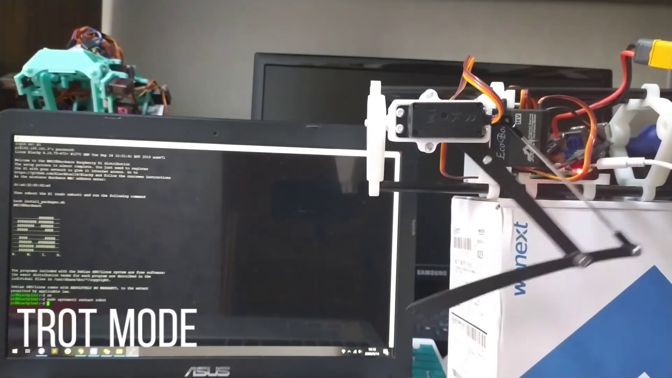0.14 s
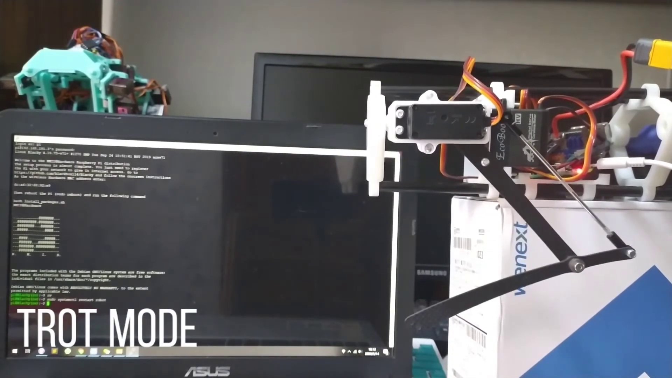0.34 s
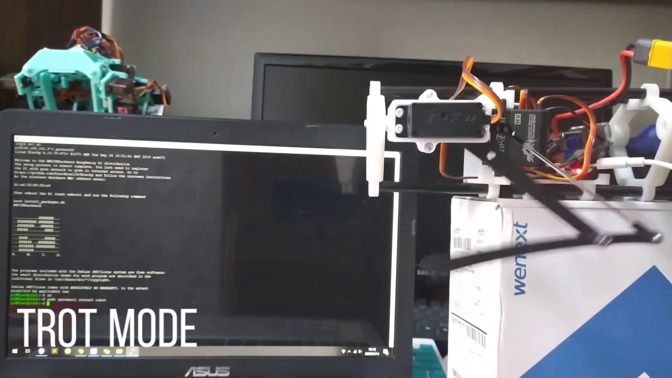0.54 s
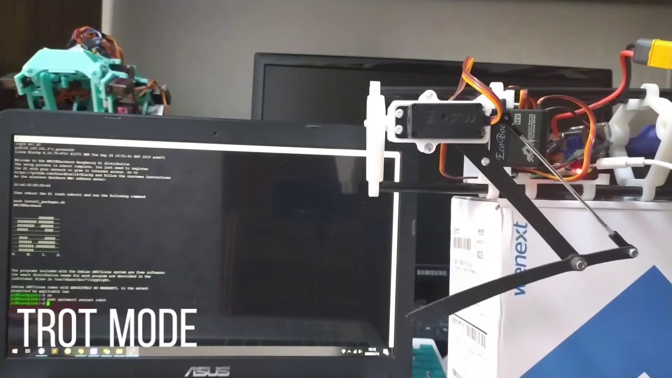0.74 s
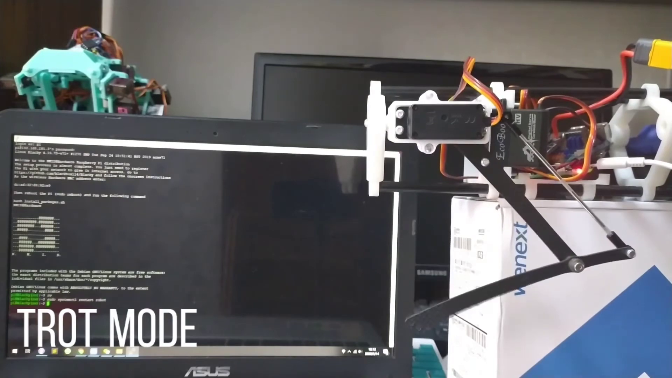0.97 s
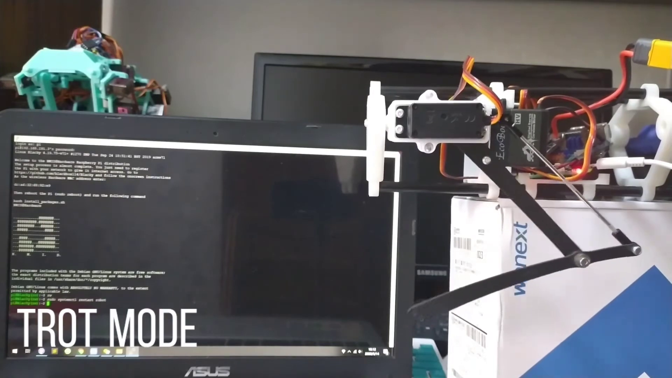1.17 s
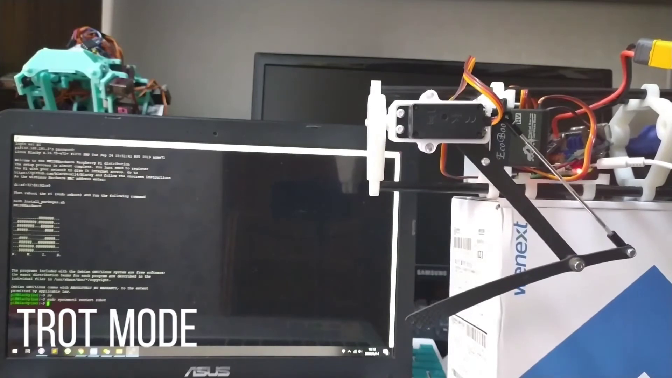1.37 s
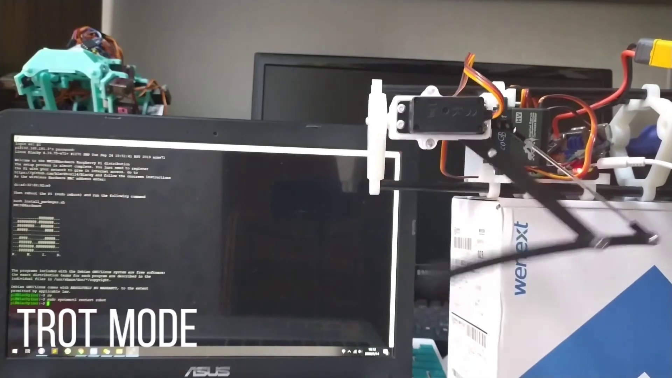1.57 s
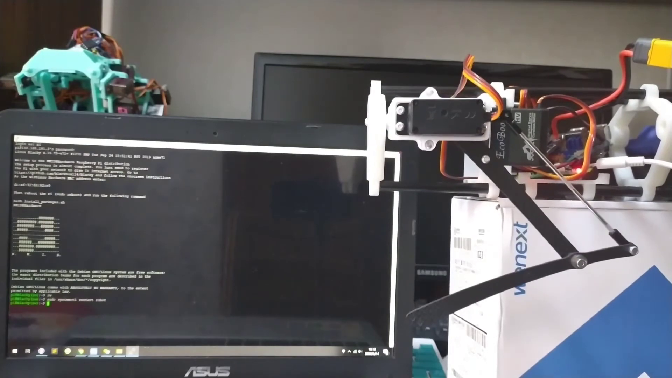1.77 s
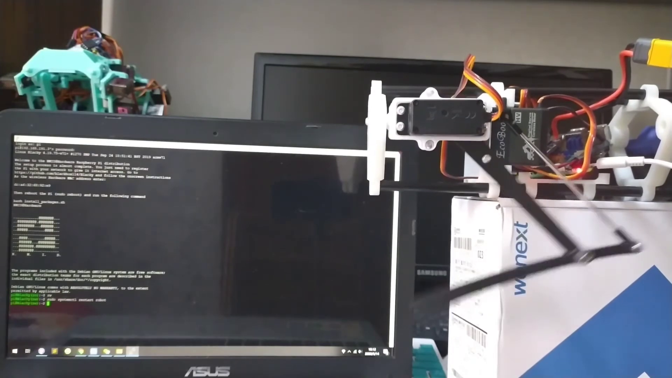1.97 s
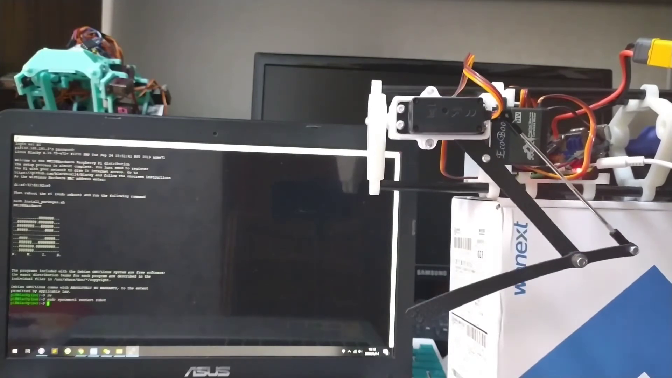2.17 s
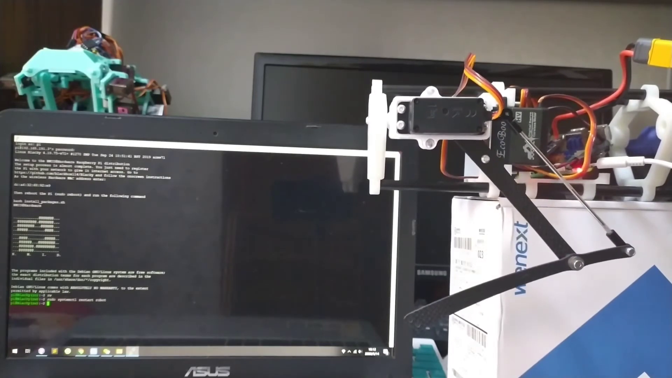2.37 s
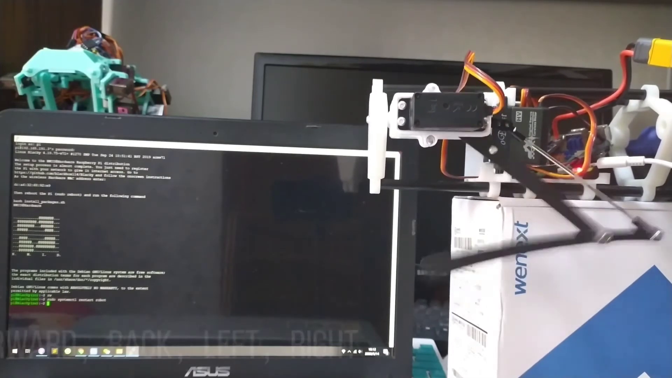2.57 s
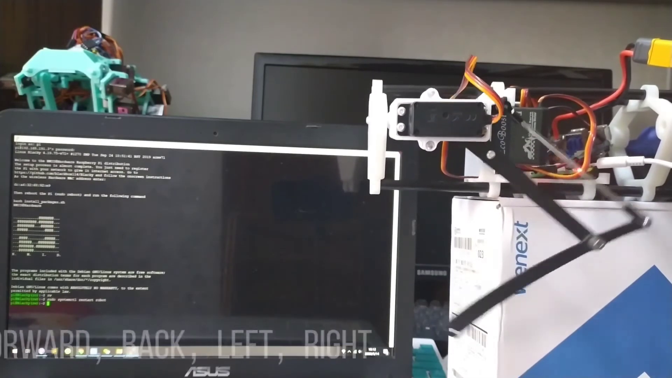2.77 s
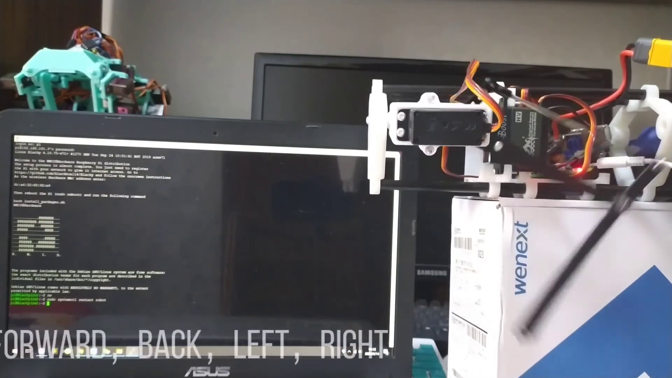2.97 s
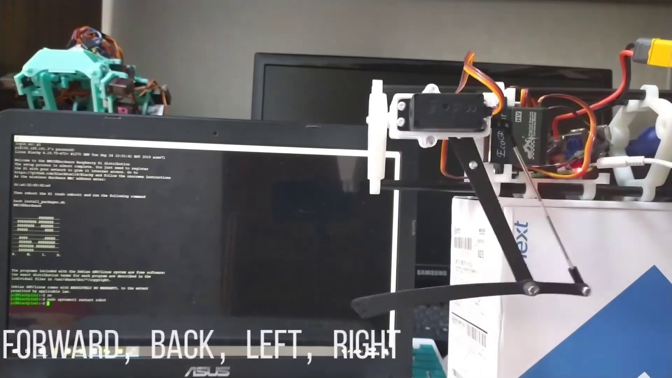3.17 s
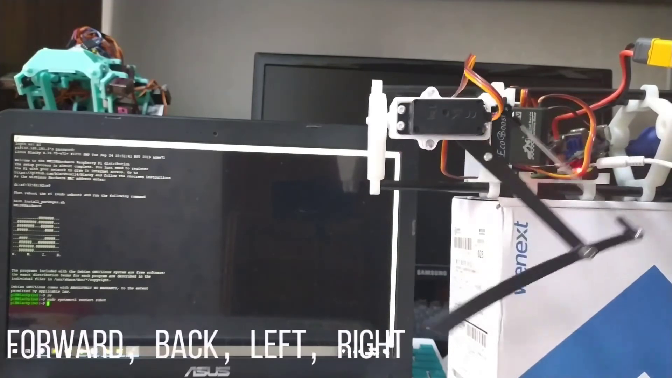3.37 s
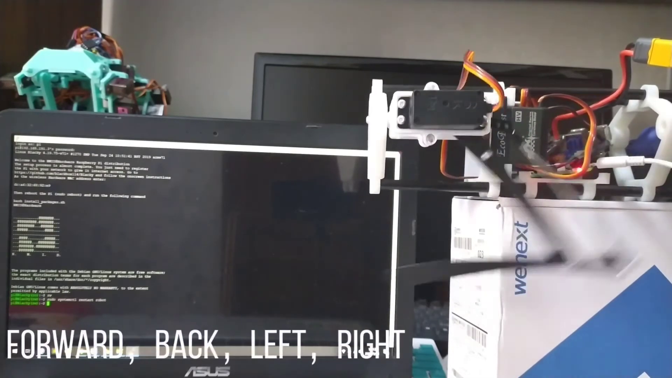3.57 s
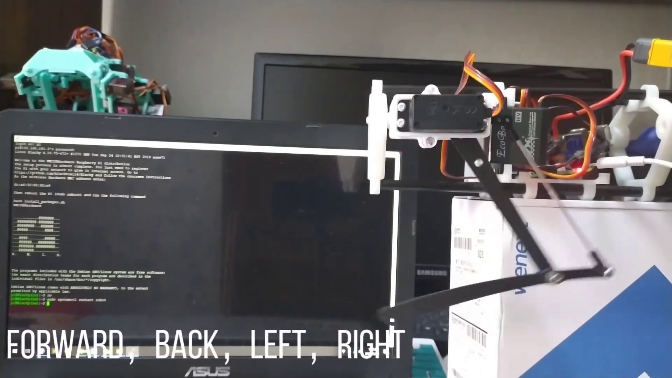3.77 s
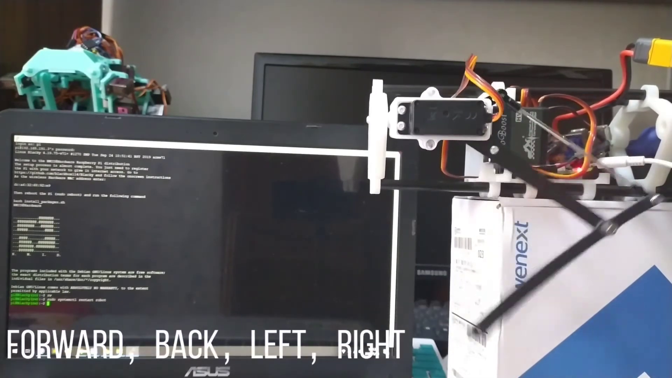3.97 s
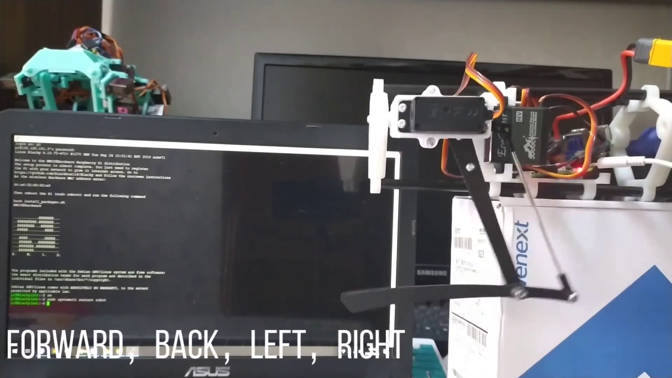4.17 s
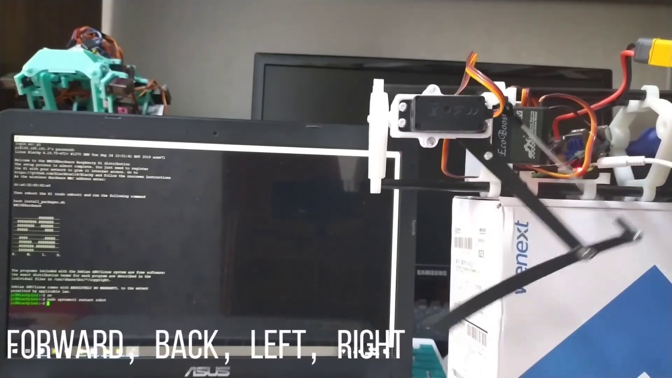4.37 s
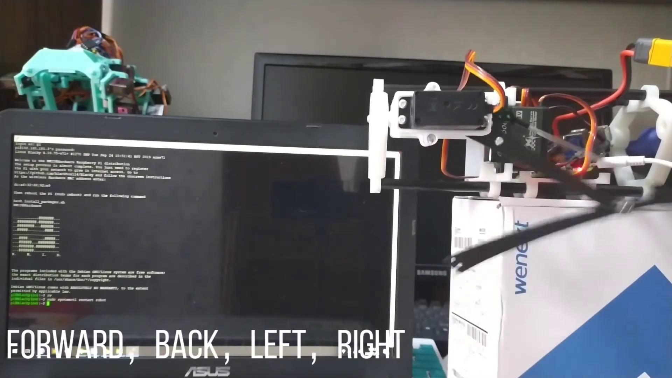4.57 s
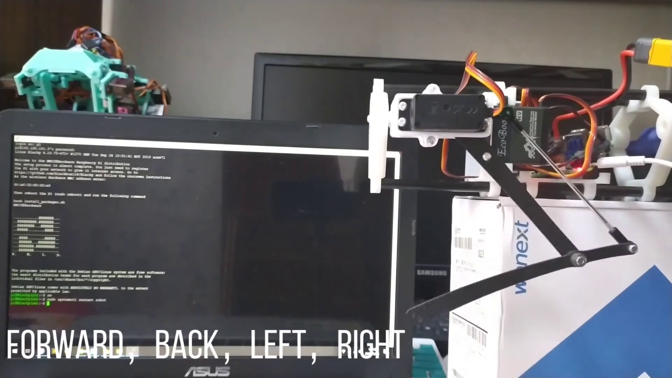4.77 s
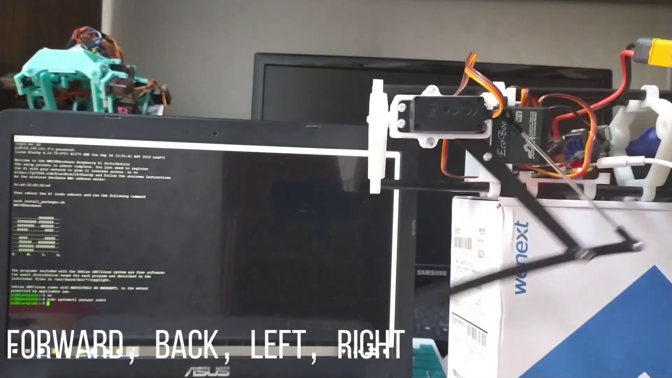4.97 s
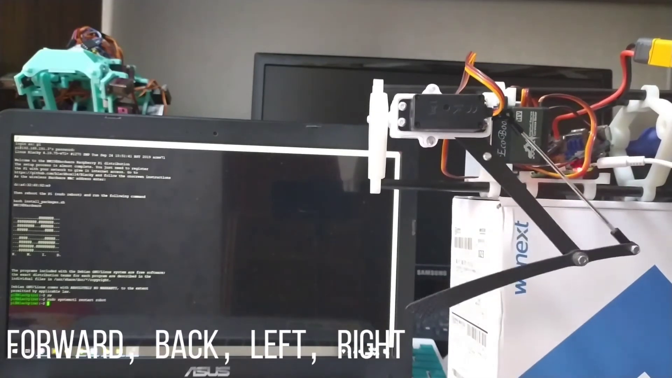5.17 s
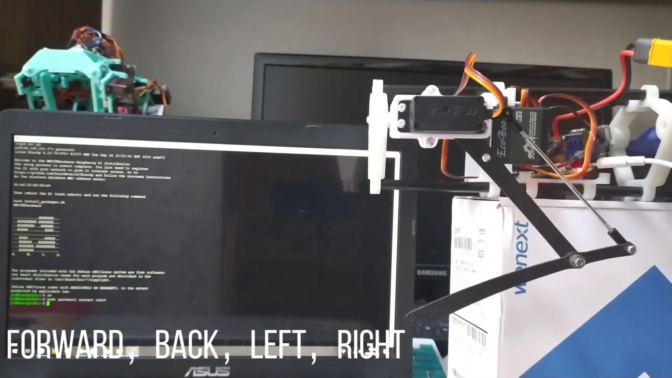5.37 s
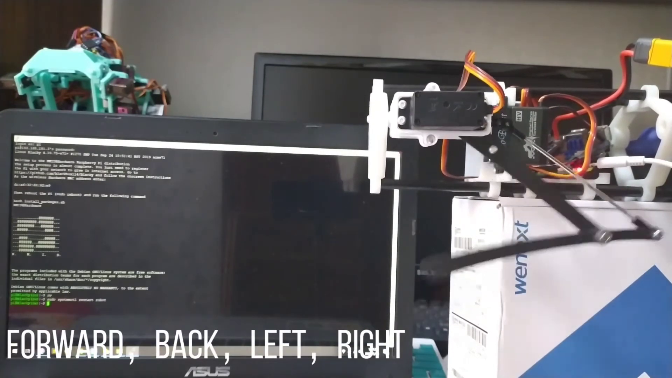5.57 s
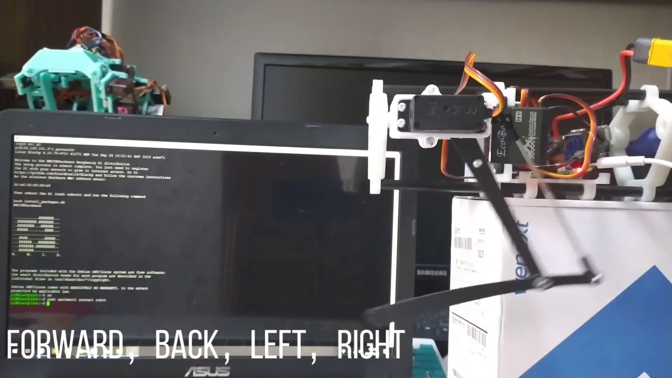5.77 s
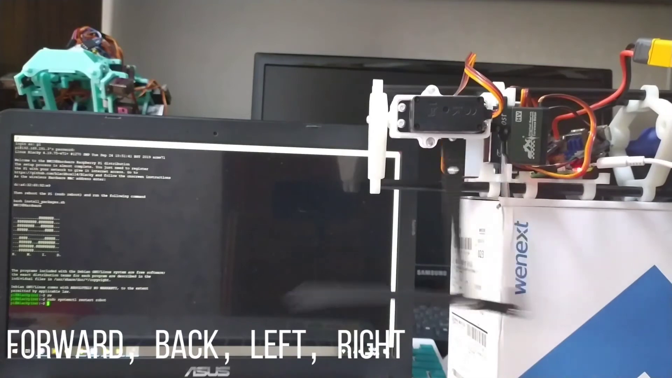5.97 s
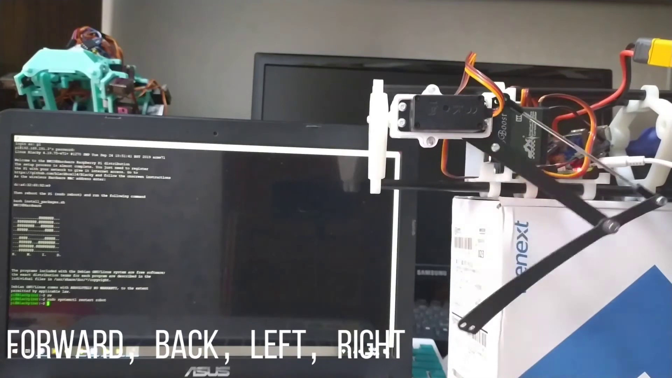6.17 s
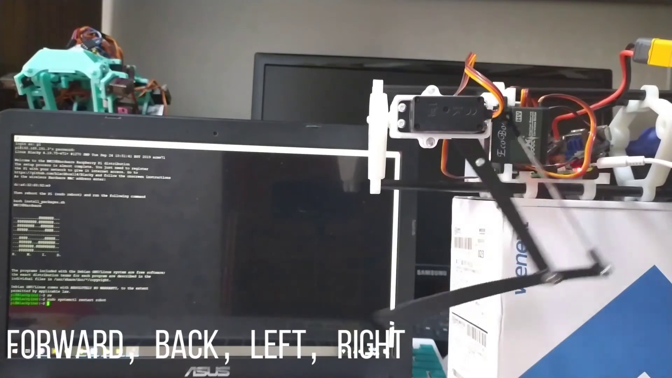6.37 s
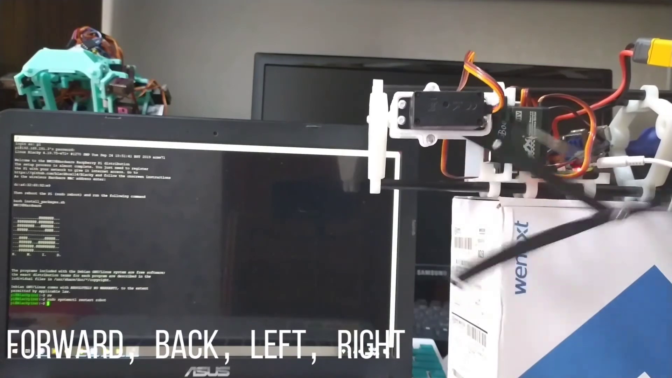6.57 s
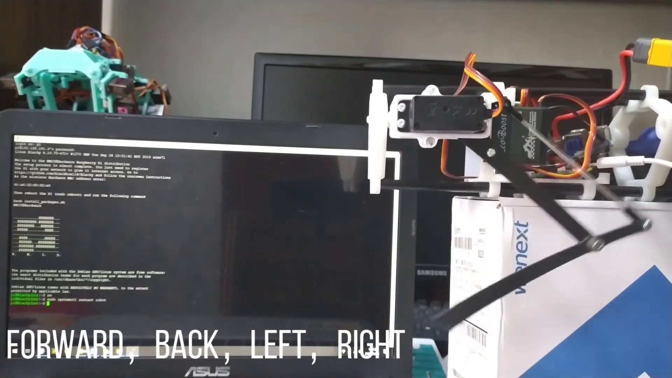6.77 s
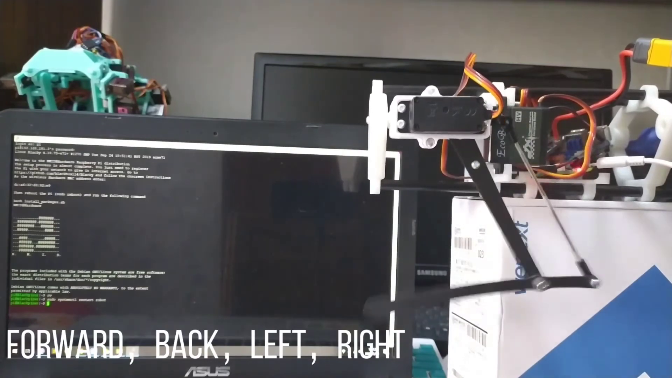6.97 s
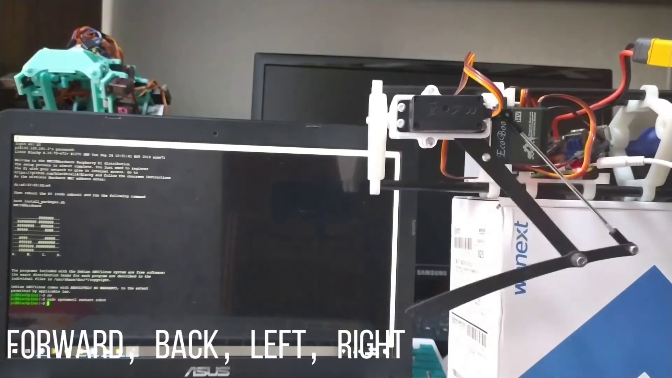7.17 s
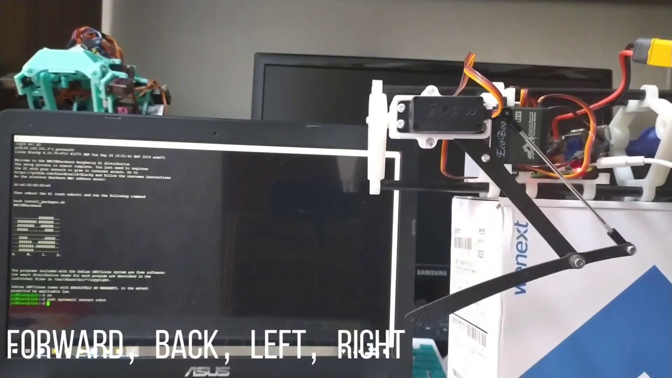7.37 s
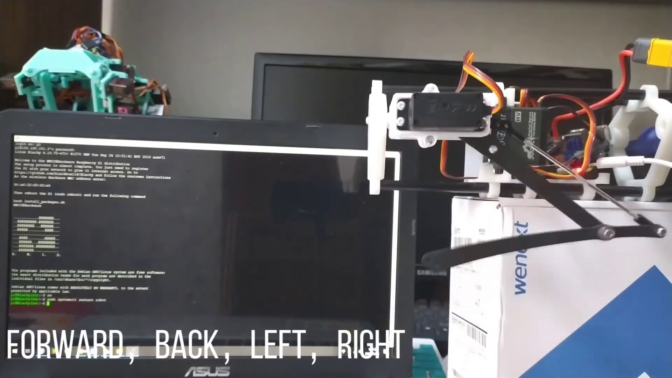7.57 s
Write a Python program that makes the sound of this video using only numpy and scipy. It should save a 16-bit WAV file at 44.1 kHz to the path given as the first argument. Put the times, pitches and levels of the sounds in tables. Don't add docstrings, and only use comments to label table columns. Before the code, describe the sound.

A small robot leg works on a bench, heard close in stereo in a quiet room with faint low hum, soft air and an intermittent, very high thin supply whistle. From 0 to 2.7 seconds, paired servo bursts come every half second: a short bright rasp, then a shorter set-down zip, with near silence between and tiny linkage ticks. From about 2.8 to 4.5 seconds the strokes run almost together, soft grinding creeps swelling into loud fast swings near 3.1, 3.6 and 4.1, with rough gear whine gliding upward. Paired steps resume at 4.6, 5.1 and 5.6 while the hum is slightly stronger until 6. From 5.8 to 7 a whining push leads to harsh swings near 6.1 and 6.6, then a softer dipping whine. Double rasp at 7.05, final burst at 7.55. Dense gritty plastic rattle dominates, with slight bench rumble and short room tail.

```python
import sys
import numpy as np
from scipy import signal
from scipy.fft import rfft, irfft, next_fast_len
from scipy.io import wavfile
from scipy.ndimage import uniform_filter1d

SR = 44100
rng = np.random.default_rng(int(sys.argv[2]) if len(sys.argv) > 2 else 0)


def wav_record(signal):
    frames = np.transpose(np.atleast_2d(signal))
    bounded = np.clip(frames, -1, 1)
    quanta = np.round(bounded * 32767).astype(np.int16)
    wavfile.write(sys.argv[1], SR, quanta)


def boost_factor(decibels):
    exponent = np.asarray(decibels, float) / 20
    return 10 ** exponent


N = 336483


def rms_one(x):
    return x / np.sqrt(np.mean(np.atleast_2d(x).mean(axis=0) ** 2) + 1e-20)


def at_hz(points, hz):
    table_hz, values = np.array(points).T
    return np.interp(np.log(hz), np.log(table_hz), values)


def drift(rate):
    r = np.exp(-80 * np.pi * rate / SR)
    slow = signal.lfilter([1], [1, -2 * r, r * r], rng.standard_normal(N // 40 + 2002))[2000:]
    return np.interp(np.arange(N) / 40, np.arange(len(slow)), slow / slow.std())


def cut(x, hz, kind, order):
    return signal.sosfilt(signal.butter(order, hz, kind, fs=SR, output="sos"), x)


def tone(hz, blur_hz, second_db, waver_db):
    turn = 2 * np.pi * np.cumsum(hz + blur_hz * drift(60)) / SR
    overtones = 0
    for number, share in [(2, 1), (3, .9), (4, .7), (5, .7), (6, .6)]:
        overtones = overtones + share * np.sin(number * turn)
    return np.sqrt(2) * boost_factor(waver_db * drift(40)) * (np.sin(turn) + boost_factor(second_db) * overtones)


# (f/Hz, level/dB per Hz)
AIR = [(12, -30), (20, 1), (33, -7), (64, -6), (82, -12.5), (149, -22), (200, -10), (293, -18), (405, -20),
       (608, -22.5), (819, -21), (1410, -25.5), (3090, -29.5), (5610, -41.5), (11000, -32), (14500, -44)]
# (f/Hz, likeness -1 to 1)
LIKENESS = [(25, -0.4), (60, .6), (130, 0.67), (300, 0.45), (640, 0.21), (1400, -0.45), (3000, .1),
            (15000, -0.15)]


def air():
    out, edges = 0, 20 * 2 ** np.arange(0, 9.8, .5)
    white = rng.standard_normal((2, 2, N))
    for k, (low, high) in enumerate(zip(edges, edges[1:])):
        mid, side = cut(white[k % 2], [low, high], "band", order=2)
        hz = np.sqrt(low * high)
        alike = np.clip(at_hz(LIKENESS, hz), -.95, .95)
        stereo = mid + np.sqrt((1 - alike) / (1 + alike)) * side * [[1], [-1]]
        out = out + boost_factor(at_hz(AIR, hz) + 1.87 * drift(24)) * stereo
    return boost_factor(-63) * rms_one(out)


HUM_HZ, HUM_DB = 61, -69.5
HUM_SWELL_S, HUM_SWELL_DB = (3.54, 6.03), 5


def mains_hum():
    t = np.arange(N) / SR
    swell = uniform_filter1d(1. * (t > HUM_SWELL_S[0]) * (t < HUM_SWELL_S[1]), size=SR // 3)
    level = boost_factor(HUM_DB + HUM_SWELL_DB * swell - 2)
    return level * tone(HUM_HZ + 3.5 * drift(4), blur_hz=8, second_db=-40, waver_db=3.0) * [[.9], [1.0]]


WHISTLE_HZ, WHISTLE_DB = 15475, -77


def supply_whistle():
    on = np.clip(3 * drift(7) + .5, 0, 1)
    line = tone(WHISTLE_HZ, blur_hz=30, second_db=-99, waver_db=2.5)
    return on * [[.9], [.9]] * boost_factor(WHISTLE_DB + 6) * line


# (t/s, peak level/dB, f/Hz, decay/s)
TICKS = [(.004, -42.5, 9000, 0.0069), (.024, -53, 8000, 0.022), (0.352, -44, 8180, 0.025),
         (0.388, -52, 1510, 0.026), (.495, -44, 7600, 0.011), (.9, -59, 8500, 0.0173),
         (1.327, -47.5, 600, 0.0048), (1.389, -52.5, 8540, 0.018), (1.993, -53, 8480, 0.0086),
         (2.286, -48, 7664, .008), (3.273, -38, 7950, 0.014), (4.514, -40, 950, 0.013),
         (5.729, -44, 790, 0.0088), (6.788, -46.5, 799, 0.0098)]


def ticks():
    out, t = np.zeros((2, N + 3000)), np.arange(3000) / SR
    for s, db, hz, decay in TICKS:
        puff = rng.standard_normal((2, 3000)) * t * np.exp(-2 * t / decay)
        puff = cut(puff, [hz * 0.74, hz * 1.52], "band", order=2)
        first = round(s * SR)
        out[:, first:first + 3000] += boost_factor(db) * puff / np.abs(puff).max()
    return out[:, :N]


# (start t/s, lift level/dB, set-down level/dB, mesh f/Hz, rotor level/dB)
STEPS = [(0.055, -35, -34, 1660, -64), (0.555, -35, -33, 1536, -61), (1.054, -35.5, -35, 1554, -58),
         (1.554, -36.5, -34.5, 1552, -60), (2.053, -36, -34.5, 1562, -58), (2.554, -36, -30.5, 1514, -67.5),
         (4.557, -33, -33.5, 1706, -78), (5.056, -37, -34.5, 1522, -68), (5.556, -36, -32, 1596, -65),
         (7.047, -33, -30.5, 1777, -64), (7.555, -35, -35, 1650, -70)]
LIFT_S, LIFT_RISE_DB = 0.072, 1
SET_AFTER_S, SET_S, SET_FALL_DB = 0.11, .046, 5
# (start t/s, powered length t/s, first rattle level/dB, last rattle level/dB, mesh f/Hz)
WALK = [(0.396, 0.15, -73, -61.5, 1650), (2.768, 0.0737, -50.5, -43.5, 1718), (2.835, 0.14, -41, -42, 1590),
        (2.98, 0.052, -29.5, -36, 1650), (3.05, 0.161, -26.5, -31.5, 1800), (3.287, 0.12, -49, -46.5, 1680),
        (3.413, 0.14, -39.5, -43, 1640), (3.562, 0.13, -27.5, -31, 1820), (3.759, 0.169, -48, -47, 1787),
        (3.9, 0.15, -36.5, -43.5, 1700), (4.047, 0.14, -32.5, -31, 1807), (4.262, 0.15, -47, -45.5, 1809),
        (4.414, 0.092, -33.5, -45.5, 1680), (4.487, 0.062, -47.5, -39, 1624),
        (5.789, 0.21, -44.5, -43.5, 1547), (6.001, .04, -37.5, -36.5, 1640), (6.052, 0.17, -28, -34, 1820),
        (6.278, 0.11, -49.5, -45, 1670), (6.37, 0.17, -40, -42.5, 1620), (6.548, 0.15, -32.5, -32.5, 1775),
        (6.77, 0.1, -47, -46.5, 1712), (6.858, 0.095, -43, -38, 1715), (6.959, 0.046, -46.5, -50, 1715)]


def strokes():
    lifts = [(s, LIFT_S, db - LIFT_RISE_DB, db + LIFT_RISE_DB, hz, 0) for s, db, _, hz, _ in STEPS]
    sets = [(s + SET_AFTER_S, SET_S, db + SET_FALL_DB / 2, db - SET_FALL_DB / 2, hz, 0)
            for s, _, db, hz, _ in STEPS[:-1]]
    return lifts + sets + [(*row, 1) for row in WALK]


SPIN_UP_S, RUN_DOWN_DB_PER_S = 0.015, 442
PITCH_LAG, PITCH_LAG_S = 0.13, .035


def effort():
    power, since = np.full((3, N + SR), 1e-12), np.arange(SR // 2) / SR
    ones, catch_up = np.ones(SR // 2), 1 - PITCH_LAG * np.exp(-since / PITCH_LAG_S)
    spin = (1 - np.exp(-since / SPIN_UP_S)) ** 2
    for start, length, first_db, last_db, hz, walking in strokes():
        db = first_db + (last_db - first_db) * np.clip(since / length, 0, 1)
        db = db - RUN_DOWN_DB_PER_S * np.clip(since - length, 0, 1)
        first = round(start * SR)
        weights = np.array([ones, hz * catch_up, walking * ones])
        power[:, first:first + SR // 2] += (spin * boost_factor(db)) ** 2 * weights
    total, pitch, gait = power[:, :N]
    return np.sqrt(total), uniform_filter1d(pitch / total, size=500), gait / total


def contacts(per_s, spread_db):
    sizes = boost_factor(spread_db * np.minimum(rng.exponential(1, N), 4)) * rng.choice([-1, 1], N)
    return rms_one(sizes * (rng.random(N) < per_s / SR) + 1e-9)


def body(modes, per_s, spread_db, own, wander_db):
    out, share = np.zeros((2, N)), np.clip(own, 0, 1)
    knocks = [contacts(per_s, spread_db) for k in range(4)]
    for k, (hz, width, left_db, right_db, lead) in enumerate(modes):
        r, w = np.exp(-np.pi * width / SR), 2 * np.pi * hz / SR
        wander = boost_factor(wander_db * drift(6.5))
        skirt = [(1 - r ** 6) / 2, 0, -(1 - r ** 6) / 2, 1, -2 * r ** 3 * np.cos(w), r ** 6]
        for c, (db, phase) in enumerate([(left_db, lead / 2), (right_db, -lead / 2)]):
            drive = np.sqrt(1 - share) * knocks[k % 2] + np.sqrt(share) * knocks[2 + (k + c) % 2]
            mode = [np.sin(phase), r * np.sin(w - phase), 0, 1, -2 * r * np.cos(w), r * r]
            out[c] += boost_factor(db) * (1 - r) * wander * signal.sosfilt([mode, skirt], drive)
    return out


# (f/Hz, width f/Hz, left level/dB, right level/dB, phase lead of left/rad)
HIGH_MODES = [(5884, 600, -6.5, -1.5, -1.3), (6210, 220, 2, 3.5, 1.4), (6595, 240, 1.5, -3.5, 0.54),
              (7060, 190, -15, -2.5, 3.5), (7150, 1100, -0.5, 1, -1.5), (7570, 110, 2.5, 5, 3.5),
              (8046, 240, -4.5, 4.5, -2), (8800, 520, -3.5, -13.5, 3.5), (8960, 290, -7.5, 3, -3.5),
              (9340, 540, -1, 6.5, 1.1), (9838, 57, -25.5, 2.5, 0.5), (10370, 740, 3, -7.5, -1.53),
              (10740, 480, -18.5, -9, 8), (10550, 410, 4, -7.5, -9), (12200, 210, -24, -11, -3.8),
              (11300, 110, -25, -16, -7), (13100, 500, -17, -15, 2.5), (14000, 600, -18.5, -22.5, 4)]


def bright_rattle(low_db):
    raw = body(HIGH_MODES, 5000, spread_db=1.5, own=0.56, wander_db=2.5)
    high = rms_one(cut(raw, [5500, 14200], "band", order=4))
    dull = cut(high, [4600, 6900], "band", order=2)
    return high + (boost_factor(np.clip(0.2 * (low_db + 8.5), -6, 3)) - 1) * dull


# (f/Hz, width f/Hz, left level/dB, right level/dB, phase lead of left/rad)
LOW_MODES = [(2330, 480, -14, -13.5, .9), (2775, 220, -9.5, -10, -0.12), (3180, 150, -11, -10, -0.14),
             (3564, 210, -5, -3.5, -1.44), (3956, 155, -6.5, -5, -1.7), (4234, 184, -8, -7.5, -0.51),
             (4570, 130, -10, -5.5, .1), (4870, 110, -6, -4, 0.0058), (5234, 410, -9, -8, 0.45)]


def dull_rattle():
    raw = body(LOW_MODES, 3000, spread_db=3.0, own=.3, wander_db=3.5)
    return rms_one(cut(raw, [2000, 5800], "band", order=3))


# (f/Hz, width f/Hz, left level/dB, right level/dB, phase lead of left/rad)
MESH_MODES = [(1480, 106, -9, -1.5, -1.8), (1650, 48, 5, -17, 0), (1833, 193, -6.5, 2.5, -1.44)]


def rough_mesh(mesh_hz):
    raw = body(MESH_MODES, 1500, spread_db=1.0, own=.4, wander_db=5.0)
    growl = rms_one(cut(raw, [1250, 2100], "band", order=2))
    line = tone(mesh_hz, blur_hz=25.1, second_db=2.5, waver_db=7.5)
    return growl + boost_factor(-5.0) * line * [[1], [-.3]]


# (f/Hz, width f/Hz, left level/dB, right level/dB, phase lead of left/rad)
BENCH_MODES = [(177, 57, -1.5, -1.5, .1), (241, 81, -9, -8, .1), (348.7, 29, -7, -9, .2),
               (510.5, 89, -6.5, -5, 0.75), (670, 1050, -13, -12, .7)]


def bench_rumble():
    raw = body(BENCH_MODES, 600, spread_db=3.0, own=.08, wander_db=2.5)
    return rms_one(cut(raw, 130, "high", order=3))


# (level/dB re rattle in a step, level/dB re rattle in a walking stroke, dB lost per dB of effort)
LOW_LAW, MESH_LAW, BENCH_LAW = (-6.5, -7, 0.41), (-19, -19.5, 0.47), (-22, -24.5, 0.35)
USUAL_DB, SOFTEST_DB = -35, -52


def servos():
    gain, mesh_hz, gait = effort()
    over_db = np.maximum(20 * np.log10(gain), SOFTEST_DB) - USUAL_DB
    low_db, mesh_db, bench_db = [step + (walk - step) * gait - loss * over_db
                                 for step, walk, loss in (LOW_LAW, MESH_LAW, BENCH_LAW)]
    flutter = boost_factor(0.35 * drift(46))
    rattle = flutter * (bright_rattle(low_db) + boost_factor(low_db) * dull_rattle())
    return gain * (rattle + boost_factor(mesh_db) * rough_mesh(mesh_hz) + boost_factor(bench_db) * bench_rumble())


# (start t/s, length t/s, f/Hz, level/dB)
ROTOR = [
    (6.11, .13, 358, -55),
    (6.6, .14, 355, -57),
    (7.16, .09, 315, -59),
    (4.58, .1, 310, -64),
    (3.01, .06, 185, -60),
]
STEP_ROTOR_AFTER_S, STEP_ROTOR_S, STEP_ROTOR_HZ = .118, .078, 190


def rotors():
    t, out = np.arange(N) / SR, np.zeros(N)
    in_steps = [(s + STEP_ROTOR_AFTER_S, STEP_ROTOR_S, STEP_ROTOR_HZ, db) for s, *_, db in STEPS]
    for start, length, hz, db in ROTOR + in_steps:
        swell = np.sin(np.pi * np.clip((t - start) / length, 0, 1)) ** 0.2
        out += boost_factor(db) * swell * np.sin(2 * np.pi * hz * t)
    return out * boost_factor(3.4 * drift(28))


def played(tables):
    t, rows = np.arange(N) / SR, np.concatenate(tables)
    is_open = sum((t >= a[0][0]) & (t <= a[-1][0] + .03) for a in tables)
    gate = uniform_filter1d(np.clip(is_open, 0, 1) * 1., 200)
    return gate, [np.interp(t, rows[:, 0], c) for c in rows.T[1:]]


# (t/s, f/Hz, level/dB, overtones level/dB)
WHINE = [
    [(2.82, 1650, -73, 2), (2.9, 1480, -67, -2), (2.99, 1550, -78, 0), (3.03, 1700, -76, 0)],
    [(5.83, 1690, -61, 3), (5.9, 1480, -63, 0), (5.95, 1430, -56, -2), (5.99, 1540, -56.5, 0),
     (6.03, 1590, -55, 2), (6.05, 1600, -65, 3)],
    [(6.4, 1500, -71, 0), (6.45, 1600, -54, 2), (6.5, 1480, -54.5, -8), (6.53, 1450, -64, 0)],
    [(6.82, 1750, -66, -1), (6.89, 1400, -63, 0), (6.95, 1750, -49.5, -2.5), (7.0, 1700, -65, -11)],
]
# (start t/s, length t/s, first f/Hz, top f/Hz, level/dB)
SWINGS = [
    (3.07, .15, 1896, 1975, -59),
    (3.579, .14, 1800, 1955, -66),
    (4.078, .13, 1790, 1959, -59.5),
    (6.085, .135, 1707, 2024, -56),
    (6.57, .15, 1500, 1997, -60),
]
SWING_EDGE_DB, SWING_OVERTONES_DB = 8, 11.5


def whine():
    swings = []
    for s, length, first, top, db in SWINGS:
        shape = [(0, 0, 1), (.3, .6, 0), (.65, 1, 0), (1, .9, 1)]
        swings.append([(s + share * length, first + rise * (top - first), db - edge * SWING_EDGE_DB,
                        SWING_OVERTONES_DB) for share, rise, edge in shape])
    gate, (hz, db, over_db) = played(sorted(WHINE + swings))
    blur_hz = 10 + 3 * np.maximum(over_db - 3, 0)
    return gate * boost_factor(db) * tone(hz, blur_hz, second_db=over_db, waver_db=4) * [[1.4], [.7]]


ROOM_T60_S, ROOM_DB = 0.22, -7


def room(x):
    size = next_fast_len(N + SR)
    w, out = 2 * np.pi * np.arange(size // 2 + 1) / size, []
    for c in range(2):
        delays = rng.uniform(0.0067, .04, size=14)
        loops = [boost_factor(-60 * d / ROOM_T60_S) * np.exp(-1j * w * d * SR) for d in delays]
        tail = sum(g / (1 - g) for g in loops) / 4
        out.append(irfft(rfft(x[c], size) * tail, size)[:N])
    return np.array(out)


# (f/Hz, width f/Hz)
DEAD = [(2060, 220), (2580, 170), (3280, 150), (4400, 260)]


def frame(rattle):
    for hz, width in DEAD:
        depth = np.clip(.6 + .7 * drift(8), 0, 1)
        notch = np.concatenate(signal.iirnotch(hz, hz / width, SR))
        rattle = rattle + depth * (signal.sosfilt([notch] * 2, rattle) - rattle)
    return rattle


def scene():
    background = air() + mains_hum() + supply_whistle()
    rattle = ticks() + servos()
    rattle = frame(rattle + boost_factor(ROOM_DB) * room(rattle))
    return background + rattle + boost_factor(4.5) * rotors() + whine()


def band_limit(x):
    return signal.sosfilt(signal.butter(12, 15830, fs=SR, output="sos"), x)


def record(dry):
    top = signal.ellip(12, .5, 70, 15700, fs=SR, output="sos")
    mix = signal.sosfilt(top, dry)
    return band_limit(mix)


dry = scene()
out = record(dry)
wav_record(out)
```